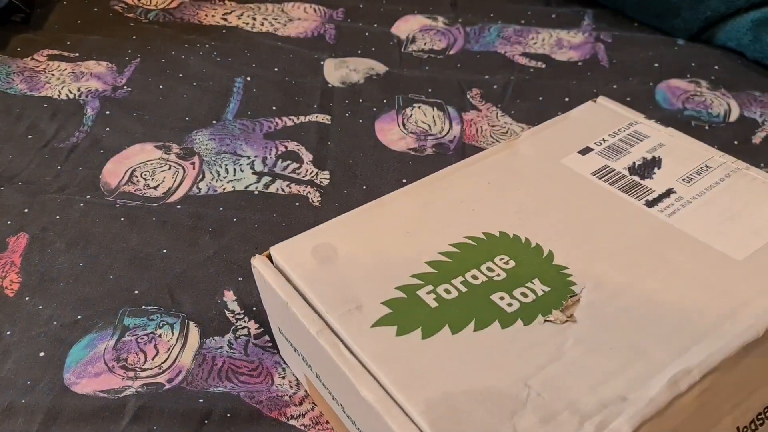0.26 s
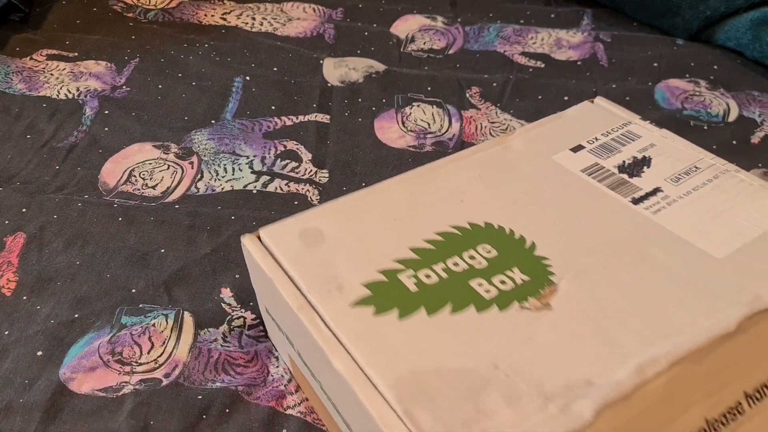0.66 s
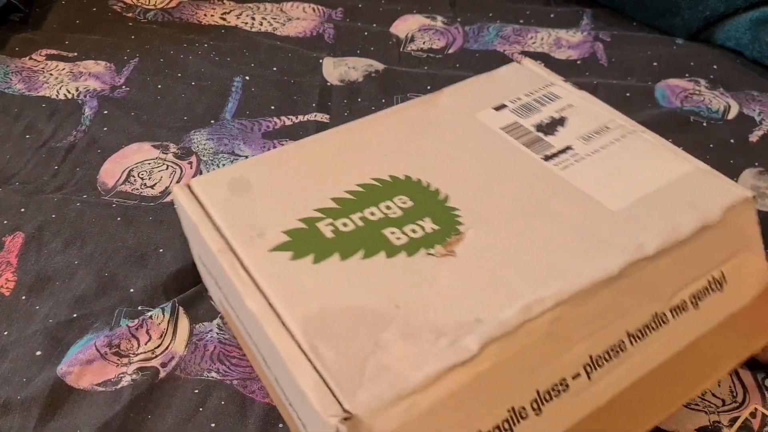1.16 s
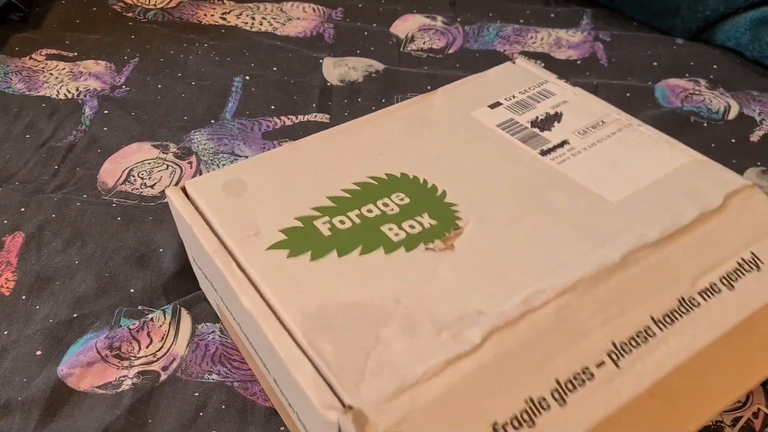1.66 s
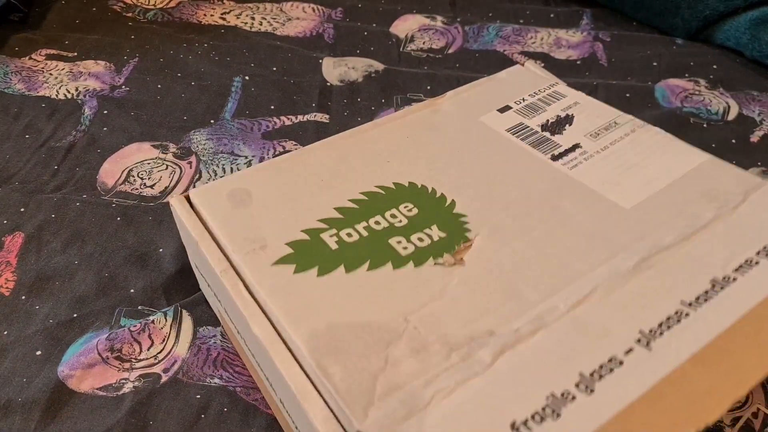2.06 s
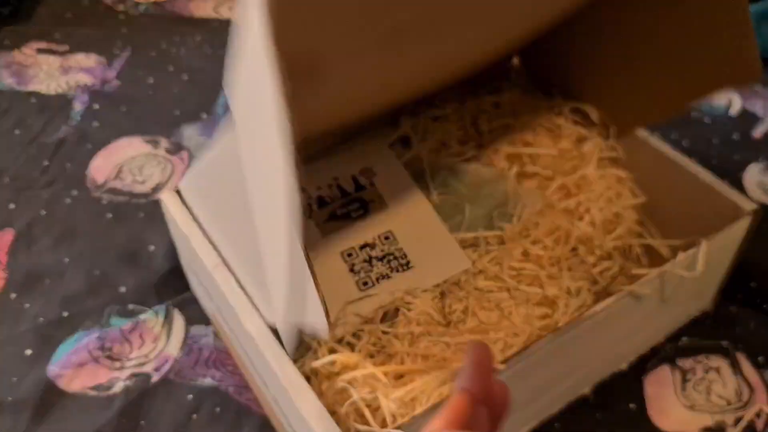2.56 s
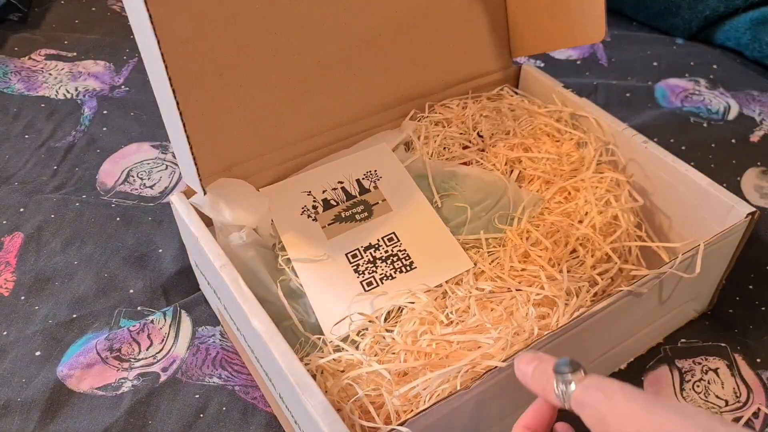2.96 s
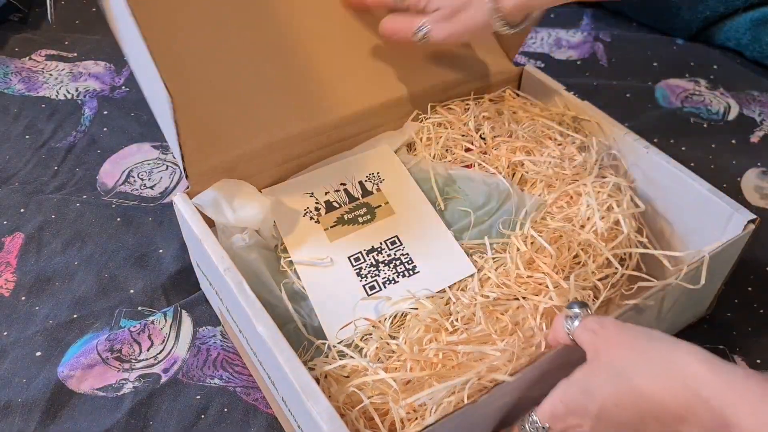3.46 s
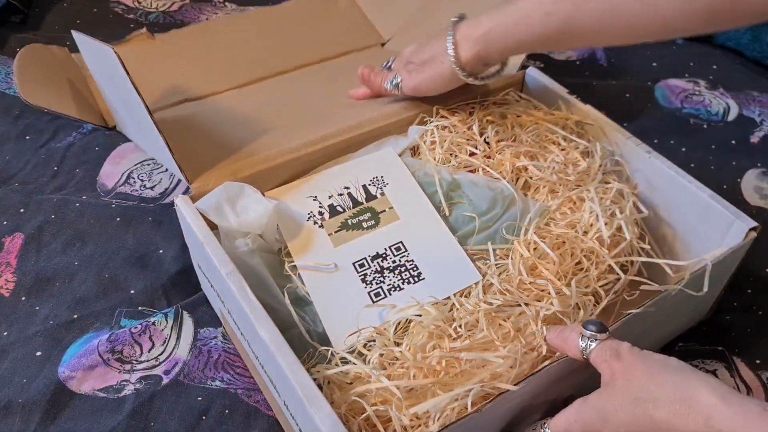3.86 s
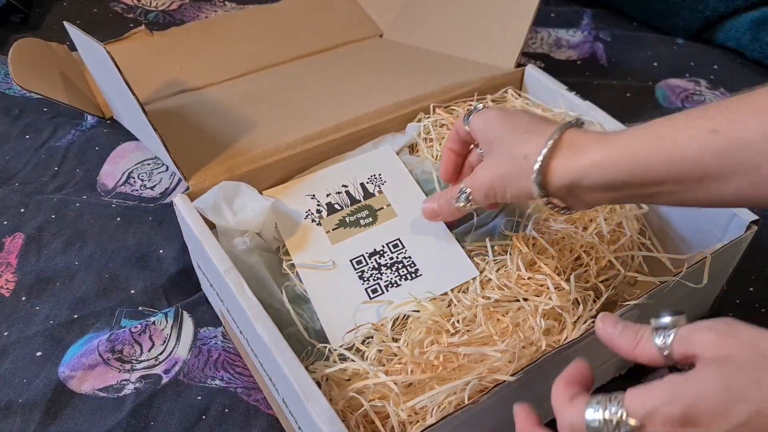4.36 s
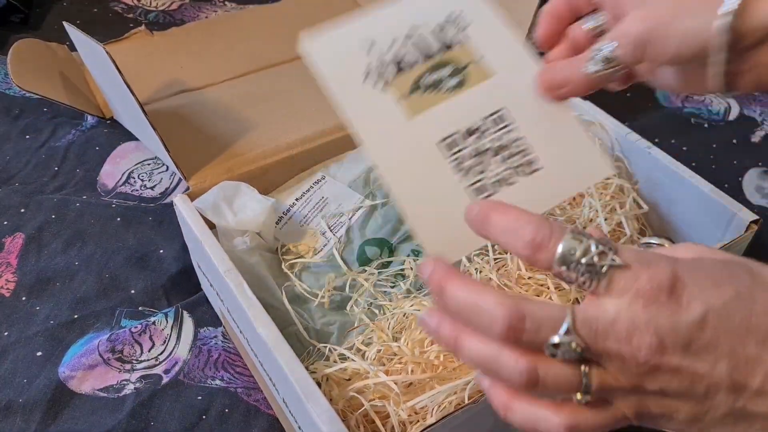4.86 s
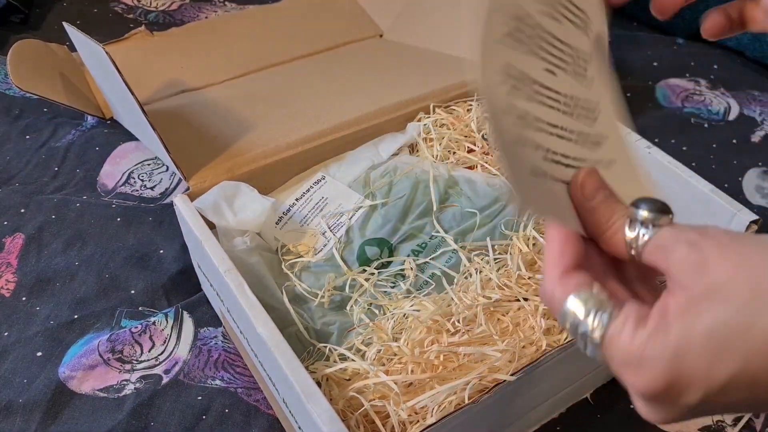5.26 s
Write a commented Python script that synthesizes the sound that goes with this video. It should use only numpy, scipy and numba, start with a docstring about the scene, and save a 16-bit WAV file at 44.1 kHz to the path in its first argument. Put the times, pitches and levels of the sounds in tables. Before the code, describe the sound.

A cardboard box on a bed is handled close to a phone in a small, soft room with a very short reflection. From 0 to 1 s, dry hissing rubs come in short strokes with light crease ticks and dull low knocks around 0.3 to 0.4 and 0.7 s. A bright, sharp snap stands out at 1.05 s. Rubbing thickens from 1.4 s, with rasping flaps and boxy thuds, peaking in a rough scrape near 1.95 s. From 2.1 to 2.85 s the lid slides with steady hiss and a faint rising ribbed buzz, ending in a cluster of scrapes and snaps at 2.9 s. A deep soft bump falls at 3.3 s, then hollow knocks at 3.65 to 4 s as the lid folds back. After that it is nearly quiet: tiny scuffs and faint squeaks around 4.5 to 4.9 s, then papery snaps at 5.2 to 5.35 s. Wavering low rumble and thin air noise continue throughout.

```python
"""A corrugated cardboard box on a bed is handled by hand, heard by a phone close by in a small soft room.
For the first four seconds the box is dragged, opened and folded back: rubbed surfaces hiss, rasp and boom from
dense tiny slips, flaps catch as shaped noise, creases tick as filtered cracks, knocks ring the panels' modes.
Just after two seconds the lid also buzzes past ribs; near the end a card is lifted from wood wool, with soft
scuffs, faint squeaks of narrow noise and last broad snaps. A wavering low rumble and air run under all of it."""
import sys
import numpy as np
from scipy import signal
from scipy.fft import rfft, irfft, next_fast_len
from scipy.io import wavfile
from scipy.ndimage import uniform_filter1d
from numba import njit

SR = 44100
rng = np.random.default_rng(int(sys.argv[2]) if len(sys.argv) > 2 else 0)


def wrap_up_sound(samples):
    """Save the sound to the file named by the first command line argument, as 16-bit audio."""
    columns = np.atleast_2d(samples).T
    # keep every value between -1 and 1, then stretch to whole-number steps
    tamed = np.clip(columns, -1, 1)
    steps = np.round(tamed * 32767).astype(np.int16)
    wavfile.write(sys.argv[1], SR, steps)


N = 242461
T = np.arange(N) / SR

# Rubbing strokes, at full level from start_s for hold_s: start_s, hold_s, hiss_db, rasp_db, boom_db
RUB_STROKES = [(0.0, 0.15, -54.5, -54.5, -55), (0.234, 0.14, -66, -63, -60), (0.427, 0.07, -58, -55.5, -61),
               (0.656, 0.12, -59.5, -57.5, -55), (0.844, 0.11, -66.5, -63, -60),
               (1.004, 0.28, -57, -55.5, -60), (1.385, 0.057, -46, -51, -54),
               (1.504, 0.14, -60.5, -54, -50.5), (1.698, 0.19, -54, -54, -50),
               (1.875, 0.095, -49, -53, -72), (2.052, 0.47, -55, -61, -58), (2.59, 0.35, -57.5, -61, -55.5),
               (3.136, 0.16, -97, -66, -66), (3.322, 0.25, -53.5, -61, -59), (3.465, 0.23, -63, -62, -55),
               (3.968, 0.016, -56, -59, -51), (4.474, 0.15, -88, -72.5, -72),
               (4.676, 0.092, -73, -69, -67.5), (5.234, 0.043, -73, -70, -64)]
# Colour of the surface hiss: freq_hz, density_db (relative, per Hz)
HISS_COLOUR = [(2500, -44), (3310, -3.5), (5070, 0), (6010, 0.5), (9010, 5.5), (12200, 6.5), (16000, 7)]
# Colour of the board rasp: freq_hz, density_db (relative, per Hz)
RASP_COLOUR = [(350, 7), (700, -9.5), (1300, 5), (2000, 1.5), (3000, 1.5), (5000, -1), (9000, -11.5)]
# Stiff patches of board that colour rasp and hiss: mean_pitch_hz, width_ratio (of the centre), gain_db (relative)
BOARD_PATCHES = [(606, 0.76, 5), (835, 0.37, -5.5), (1108, 0.045, -5), (1683, 0.065, -3.5),
                 (2780, 0.15, -2.5), (4200, 0.34, -6), (5700, 0.16, -6.5), (8100, 0.33, 2.5)]
# Box panels, the lowest being the box bouncing on the mattress: pitch_hz, gain_db (relative), t60_s
PANEL_MODES = [(49.3, 5, 0.21), (77, 12.5, 0.15), (130.5, 1, 0.075), (184, 7, 0.06), (233.5, 5.5, 0.066),
               (302.3, 8.5, 0.045), (351.3, 4.5, 0.068), (405.8, 2.5, 0.1), (446, -11.5, 0.079),
               (539, -8, 0.053), (669, -9.5, 0.063), (761, -14.5, 0.05)]
# The lid sliding past the ribbed wall: time_s, rib_rate_hz, level_db
RIB_SLIDE = [(2.152, 1212, -67), (2.299, 1278, -64), (2.5, 1394, -63), (2.67, 1428, -57),
             (2.81, 1458, -56.5), (2.85, 1390, -67)]
# Flaps catching, short scrapes:
# start_s, rasp_db, rasp_pitch_hz, width_ratio (of the centre, per filter pass), hiss_db, rise_s, length_s
FLAP_SCUFFS = [(0.281, -49, 1880, 3.2, -46.5, 0.006, 0.017), (0.301, -50, 1820, 2, -46, 0.0072, 0.077),
               (0.393, -49.5, 1980, 1.9, -46, .002, 0.1), (0.529, -50, 1970, 6.1, -55, 0.0032, 0.023),
               (0.629, -50.5, 1880, 1.8, -75, 0.0033, 0.069), (0.717, -44, 1820, 2.1, -53, 0.01, 0.048),
               (0.82, -51.5, 2000, 0.44, -55, 0.0064, 0.043),
               (1.147, -41.5, 2140, 2.44, -46.5, 0.082, 0.098),
               (1.578, -44.5, 1950, 1.8, -40.5, 0.029, 0.052), (1.722, -42, 1390, 0.61, -51.5, 0.017, 0.12),
               (1.869, -42.5, 1160, 0.44, -52, 0.0036, 0.038),
               (1.938, -33.5, 1730, 2.4, -42.5, 0.013, 0.023), (2.083, -42, 1400, 3, -41.5, 0.0025, 0.023),
               (2.804, -51, 903, 4.2, -48, 0.014, 0.027), (2.88, -42, 1650, 2, -45.5, 0.0029, 0.027),
               (2.897, -36.5, 1430, 1.3, -46, 0.013, 0.013), (2.945, -38.5, 1530, 1.9, -42, 0.024, 0.054),
               (3.659, -42, 1090, 5.1, -43, 0.0012, 0.037), (3.823, -55, 1480, 3.3, -57.5, 0.0013, 0.071),
               (3.955, -50, 1210, 2.5, -59, 0.024, 0.024), (4.462, -74.5, 4970, 1.1, -87, 0.011, 0.036),
               (4.529, -69, 3500, 1.5, -78, 0.018, 0.057), (4.664, -61.5, 4570, 1.6, -68, 0.074, 0.095),
               (4.851, -71, 5800, 1, -81, 0.02, 0.05), (5.247, -48, 2180, 2.4, -61, 0.028, 0.026),
               (5.261, -57, 2640, 1.6, -58, .003, 0.071), (5.343, -44.5, 2980, 1.85, -53.5, 0.0041, 0.032)]
# Creases and fibres snapping: start_s (1 ms before the snap), peak_db, pitch_hz, width_ratio (per filter pass)
CREASE_TICKS = [(0.3053, -43, 4000, 3), (0.357, -28, 1560, 1.2), (0.3942, -32.5, 2080, 0.34),
                (0.632, -32, 1400, 2), (0.7225, -28, 2000, 2.5), (.849, -36, 2200, 2),
                (1.05, -11, 8050, 3.4), (1.0858, -27.5, 2150, 0.48), (1.232, -28.5, 2820, .4),
                (1.3065, -34, 1420, 1.9), (1.5152, -31, 1520, 1.5), (1.676, -36, 1100, 1.5),
                (1.711, -35, 1450, 1.2), (1.7548, -24, 1500, 1.5), (1.9477, -24, 2500, 1.05),
                (2.0877, -33, 3550, 1.4), (2.884, -24, 1400, 3.5), (2.8927, -18.5, 1500, 4),
                (2.908, -29, 1850, .4), (3.285, -36, 1200, 5), (3.528, -30, 5900, 0.49),
                (3.825, -36.5, 2340, 2.8), (3.921, -39, 2110, 1.2), (4.54, -47, 4600, 0.86),
                (4.6005, -50, 800, 2), (5.1635, -39, 1500, 4), (5.2113, -45, 1200, 1.7),
                (5.2342, -37, 1800, 4.8), (5.3445, -25, 2000, 5)]
# Blows on the panels: start_s, peak_db, most_excited_pitch_hz
PANEL_KNOCKS = [(0.306, -33.5, 169), (0.332, -36.5, 356), (0.395, -31.5, 160), (.49, -44, 244),
                (.515, -40, 306), (.543, -42, 120), (0.721, -32, 290), (.727, -31.5, 219),
                (1.052, -45, 403), (1.244, -35, 247), (1.348, -40, 140), (1.589, -29, 141.6),
                (1.733, -33, 136), (1.745, -32, 128), (1.778, -34, 276), (1.837, -39.5, 353),
                (1.855, -33, 285), (1.946, -26, 300), (1.948, -28, 850), (2.089, -32, 473),
                (2.824, -32, 476), (2.894, -35, 410), (3.285, -30, 142), (3.291, -26.5, 49.6),
                (3.665, -37, 254), (3.684, -33, 73), (3.748, -45, 310), (3.825, -25.5, 430),
                (3.834, -40.5, 670), (3.841, -29, 430), (3.962, -33, 303), (3.971, -24, 316),
                (4.75, -43.5, 350), (5.164, -45.5, 265), (5.233, -41.5, 270), (5.274, -41, 260),
                (5.306, -48, 300), (5.346, -41, 330)]
# Faint narrow squeaks of sliding card and wood wool: start_s, level_db, mean_pitch_hz, length_s
CARD_SQUEAKS = [(4.53, -75, 2640, 0.11), (4.595, -62.5, 1990, 0.019), (4.7, -69, 2790, .025),
                (4.703, -68.5, 8000, 0.067), (4.72, -70, 4800, 0.043), (4.835, -63, 2040, 0.03),
                (4.765, -78.5, 2020, 0.25), (5.261, -58, 966, 0.02)]
# Where the hands work: time_s, left_minus_right_db
HAND_PAN = [(0, -1.5), (.4, -3.5), (1.1, -1.5), (2.07, -1), (2.56, -2.5), (2.95, -0.5), (3.26, -2),
            (4.2, -0.5), (5.5, -2.5)]
# How much differs between the two ports: freq_hz, gain_db
PORT_DIFFERENCE = [(60, -12), (300, -12.5), (900, -5.5), (2000, -2), (6000, -3)]
# Colour of room air and microphone hiss: freq_hz, density_db (relative, per Hz)
AIR_COLOUR = [(20, -36), (80, 3.5), (150, -13), (400, -18.5), (900, -28), (2500, -32), (5000, -38.5),
              (7800, -46), (10500, -41), (16000, -43)]
# Low rumble as the mattress and the hand-held phone sway: time_s, level_db
SWAY_LEVEL = [(0.0, -62), (0.57, -55.5), (1.02, -63), (1.71, -56), (2.3, -60.5), (3.26, -62), (3.43, -59),
              (4.29, -62), (5.14, -55.5), (5.5, -74)]

# The hiss of a stroke dies first, the boom last
SWELL_DB_PER_S, FADE_DB_PER_S = 296, np.array([[150], [110], [95]])
AIR_DB = -63.5
ROOM_T60_S, ROOM_DB, ROOM_LOW_CUT_HZ = .12, -7.5, 810
TOP_HZ = 15900


def strokes():
    """Levels of hiss, rasp and boom: each stroke swells, holds and fades; overlapping powers add."""
    power = 0
    for start, hold, *levels_db in RUB_STROKES:
        swell_db = SWELL_DB_PER_S * np.maximum(start - T, 0)
        fade_db = FADE_DB_PER_S * np.maximum(T - start - hold, 0)
        power = power + undb(np.array(levels_db)[:, None] - swell_db - fade_db) ** 2
    return 10 * np.log10(power)


def rubbing(hiss_db, rasp_db, boom_db):
    """Fine slips hiss, coarser ones rasp in the board and shake the panels; contact is patchy, fibres crackle."""
    patchy_db, press_db = 1.57 * walk(40), 0.23 * walk(23.37)
    hiss = unit(colour(board(slips(3.3)), HISS_COLOUR))
    hiss *= undb(hiss_db + patchy_db + 0.37 * walk(83))

    grit = slips(2.97)
    # about 70 crackles a second
    grit += 7.9 * rng.standard_normal(N) * (rng.random(N) < 70 / SR)
    rasp = unit(colour(board(grit), RASP_COLOUR))
    rasp *= undb(rasp_db + patchy_db + press_db)

    push = np.diff(0.5 * grit + slips(3.6), prepend=0)
    boom = unit(ring(push, [hz > 100 for hz, *_ in PANEL_MODES]))  # no mattress bounce
    boom = boom * undb(boom_db + patchy_db + press_db + 0.41 * walk(22.85))
    return hiss + rasp + boom


def slips(spread_db):
    """Dense stick-slip steps, most tiny, some larger, along two unrelated stretches of the contact."""
    size = np.minimum(rng.exponential(size=(2, N)), 5.5)
    return unit(rng.standard_normal((2, N)) * undb(spread_db * size))


def board(grit):
    """As the contact moves, each patch of the board drifts in pitch and comes and goes."""
    out = .5 * unit(grit)
    for hz, width, db in BOARD_PATCHES:
        centre_hz = hz * undb(1.2 * walk(9))  # typically some 15 % off
        gain = undb(db + 1.73 * walk(18))
        patch = np.array([svf(part, centre_hz, 1. * width) for part in grit])
        out = out + gain * unit(patch) / 3
    return out


def ring(push, weights):
    """The panels ring on after a push as decaying modes, each as strongly as its weight."""
    out = 0
    for (hz, db, t60), weight in zip(PANEL_MODES, weights):
        pole = np.exp(2j * np.pi * hz / SR - np.log(1000) / (t60 * SR))
        out = out + weight * undb(db) * signal.lfilter([1], [1, -pole], push).imag
    return out


def ribs():
    """An edge crosses uneven ribs at a wavering speed: blurred bands on multiples of the rib rate."""
    time, rate_hz, level_db = np.transpose(RIB_SLIDE)
    speed_hz = np.interp(T, time, rate_hz) * (1 + 0.021 * walk(8.8))
    phase = 2 * np.pi * np.cumsum(speed_hz) / SR
    buzz = 0
    for k in range(1, 5):
        blur = 420 * k ** .3  # new random values a second
        parts = [walk(blur) * np.cos(k * phase) + walk(blur) * np.sin(k * phase) for _ in range(2)]
        buzz = buzz + undb(-5.6 * k) * np.array(parts)
    slide_db = np.interp(T, time, level_db, left=-200, right=-200)
    return unit(buzz) * undb(3 * walk(45)) * undb(slide_db)


def scuffs():
    """Each caught flap builds up, scrapes unevenly and lets go fast."""
    out = np.zeros((2, N))
    hiss = unit(colour(board(slips(5.2)), HISS_COLOUR))
    grit, patchy = board(slips(3.7)), undb(2.6 * walk(230))
    t = T[:int(.15 * SR)]
    for start, rasp_db, hz, width, hiss_db, rise, length in FLAP_SCUFFS:
        i = int(start * SR)
        part = slice(i, i + len(t))
        build = np.clip(t / rise, 0, 1) ** 0.59
        sag = 1.51 * np.maximum(t - rise, 0) / length
        let_go = np.maximum(t - length, 0) / 0.0058
        shape = build * np.exp(-let_go - sag)
        rasp = band(band(grit[:, part], hz, width), hz, width)
        for db, noise in ((rasp_db, rasp), (hiss_db, hiss[:, part])):
            scrape = unit(shape * patchy[part] * noise)
            out[:, part] += undb(db) * scrape * np.sqrt(np.mean(shape ** 2))
    return out


def ticks():
    """Fibres start to give, then a sudden step excites the sheet's local stiffness; small cracks follow."""
    out = np.zeros((2, N))
    t = T[:int(.03 * SR)]
    snap = int(.001 * SR)
    for start, db, hz, width in CREASE_TICKS:
        chance = rng.standard_normal((2, len(t)))
        crack = 0.18 * chance * np.exp(-np.abs(t - t[snap]) / 0.00056)
        crack[0, snap] = -1
        width = np.clip(width, .1, SR / 2 / hz * .95)  # keeps the filter valid
        click = band(band(crack, hz, width), hz, width)
        click = click + 0.29 * band(crack, 6900, 0.68)  # a bright resonance shared by every tick
        i = int(start * SR)
        out[:, i:i + len(t)] += undb(db) * click / np.abs(click).max()
    return out


def knocks():
    """A panel is pushed in and springs back; the pitch of the blow decides which panels answer."""
    out = np.zeros(N)
    modes_hz = np.array(PANEL_MODES)[:, 0]
    for start, db, hz in PANEL_KNOCKS:
        push = np.zeros(int(.4 * SR))
        contact = int(.7 * SR / hz)
        push[:contact] = np.gradient(np.hanning(contact))
        octaves = np.log2(modes_hz / hz)
        near = np.exp(-(octaves / 0.22) ** 2)
        overtones = 0.21 * np.exp(-((octaves - .75) / 0.39) ** 2)
        thud = ring(push, near + overtones + 0.063)
        i = int(start * SR)
        out[i:i + len(push)] += (undb(db) * thud / np.abs(thud).max())[:N - i]
    return out


def squeaks():
    """Card and wood wool slide in short broken swells of narrow noise whose pitch wanders."""
    noise = rng.standard_normal((2, N))
    drift, broken = 1 + .01 * walk(25), undb(2 * walk(60))
    out = 0
    for start, db, hz, length in CARD_SQUEAKS:
        pitch_hz = hz * drift
        narrow = unit(np.array([svf(svf(part, pitch_hz, 0.058), pitch_hz, 0.06) for part in noise]))
        swell = np.exp(-((T - start - length / 2) / (length / 2)) ** 2)
        out = out + undb(db) * broken * narrow * swell
    return out


def spread(pair):
    """A broad source: one part reaches both ports alike, the other in opposition, more so in the treble."""
    return pair[0] + colour(pair[1], PORT_DIFFERENCE) * np.array([[1], [-1]])


def room(x):
    """Near reflections from box, bed and walls, a decaying noise tail that differs at each port."""
    t = T[:int(ROOM_T60_S * SR)]
    decay = np.exp(-np.log(1000) * t / ROOM_T60_S) * (t > .0004)
    tail = rng.standard_normal((2, len(t))) * decay
    tail = signal.lfilter(*signal.butter(1, ROOM_LOW_CUT_HZ, "high", fs=SR), tail)
    tail *= undb(ROOM_DB) / np.sqrt(np.sum(tail ** 2, axis=1, keepdims=True))
    return x + signal.fftconvolve(x, tail, axes=1)[:, :N]


def background():
    """Coloured noise for the air, and noise through two low resonances for a rumble that comes in swells."""
    air = unit(colour(rng.standard_normal((2, N)), AIR_COLOUR)) * undb(AIR_DB + 0.89 * walk(3.0))
    sway = unit(band(band(rng.standard_normal((2, N)), 53.4, 0.47), 49, 0.91))
    sway_db = np.interp(T, *np.transpose(SWAY_LEVEL)) + 2.4 * walk(6)
    return air + sway * undb(sway_db)


def undb(db):
    """Decibels to an amplitude ratio."""
    return 10 ** (np.asarray(db) / 20)


def unit(x):
    """Scale to an RMS of 1."""
    return x / np.sqrt(np.mean(x ** 2))


def walk(rate):
    """Smoothed chance with an RMS of 1, from rate new random values a second."""
    k = int(SR / rate)
    steps = np.repeat(rng.standard_normal(N // k + 1), k)
    return unit(uniform_filter1d(uniform_filter1d(steps, k), k)[:N])


def colour(x, table):
    """Shape a spectrum by (freq_hz, gain_db) points joined on a log frequency axis."""
    hz, db = np.transpose(table)
    size = next_fast_len(N)
    f = np.maximum(np.arange(size // 2 + 1) * SR / size, 1)
    gain = undb(np.interp(np.log(f), np.log(hz), db))
    return irfft(rfft(x, size) * gain, size)[..., :N]


def band(x, hz, width):
    """One fixed resonance, width in parts of the centre."""
    return signal.lfilter(*signal.iirpeak(hz, 1 / width, fs=SR), x)


@njit
def svf(x, hz, width):
    """State-variable band-pass whose centre may move; width in parts of the centre."""
    y, band_state, low_state = np.empty(len(x)), 0., 0.
    for i in range(len(x)):
        g = np.tan(np.pi * hz[i] / SR)
        v = (band_state + g * (x[i] - low_state)) / (1 + g * (g + width))
        band_state = 2 * v - band_state
        low_state += 2 * g * v
        y[i] = width * v
    return y


def sides(pan_db):
    """Left and right gains for a left-minus-right level."""
    return undb(np.array([pan_db, -pan_db]) / 2)


def scene():
    """The box follows the hands between the ports, in the room, over the background."""
    surfaces = rubbing(*strokes()) + ribs() + scuffs() + squeaks() + ticks()
    box = spread(surfaces) + knocks()
    hands = sides(np.interp(T, *np.transpose(HAND_PAN)))
    return room(box * hands) + spread(background()) * sides(-2.4)[:, None]


def record(dry):
    """The right port hears everything two samples late; the deepest bass and the top are cut."""
    late = [dry[0], np.roll(dry[1], 2)]
    bass_cut = signal.butter(2, 34, "high", fs=SR, output="sos")
    top_cut = signal.ellip(10, .2, 70, TOP_HZ, fs=SR, output="sos")
    return signal.sosfilt(top_cut, signal.sosfilt(bass_cut, late))


dry = scene()
out = record(dry)
wrap_up_sound(out)
```